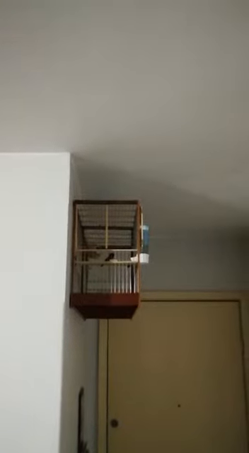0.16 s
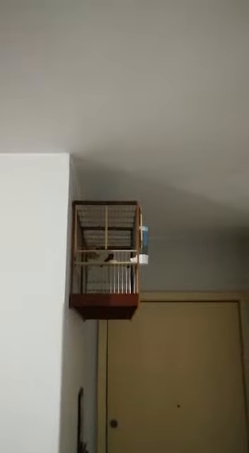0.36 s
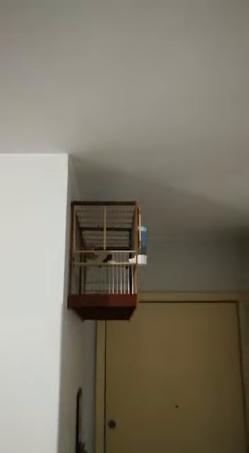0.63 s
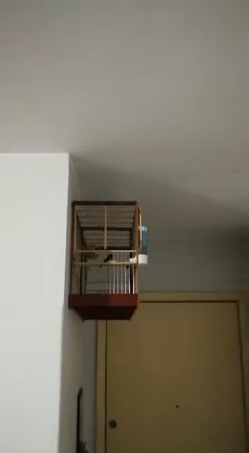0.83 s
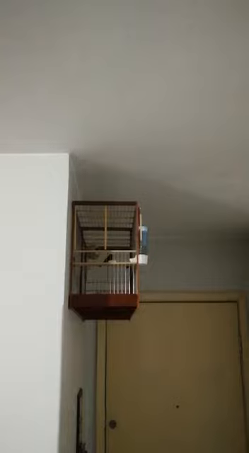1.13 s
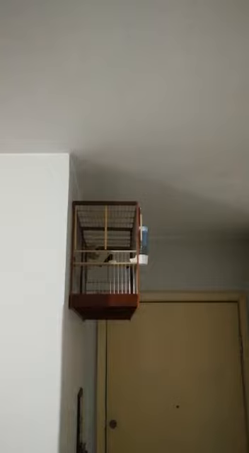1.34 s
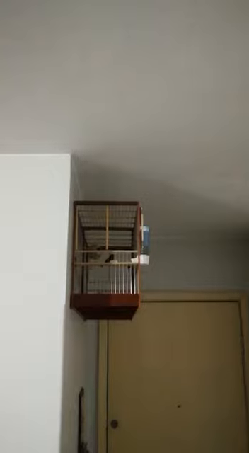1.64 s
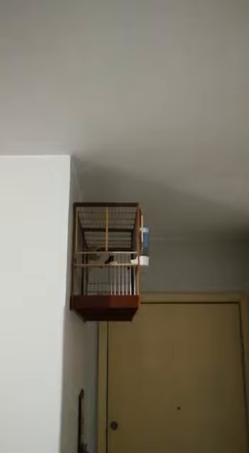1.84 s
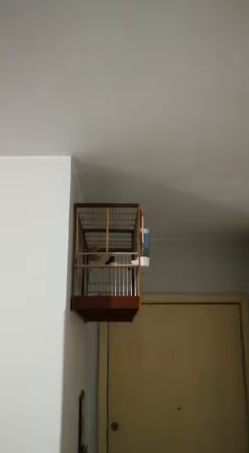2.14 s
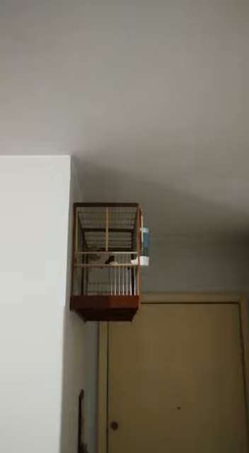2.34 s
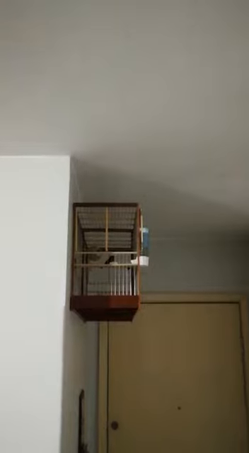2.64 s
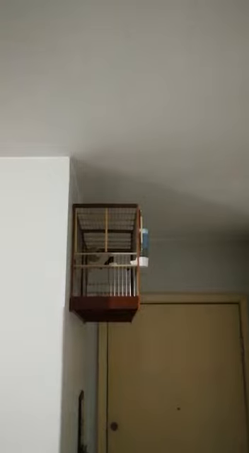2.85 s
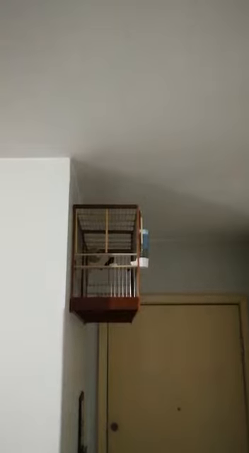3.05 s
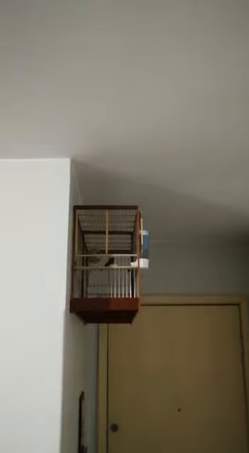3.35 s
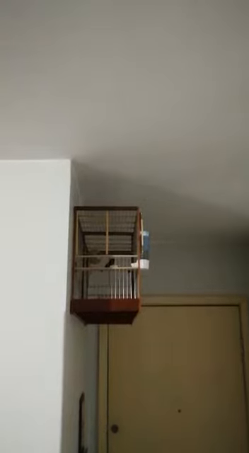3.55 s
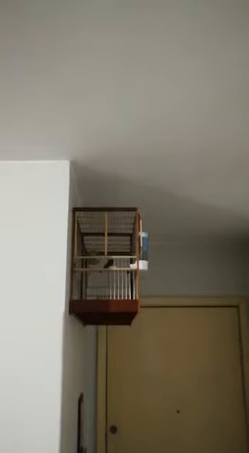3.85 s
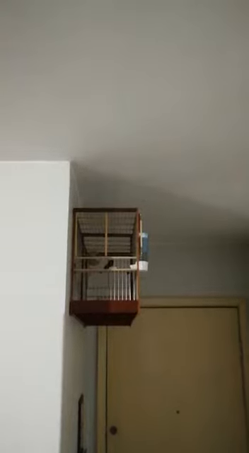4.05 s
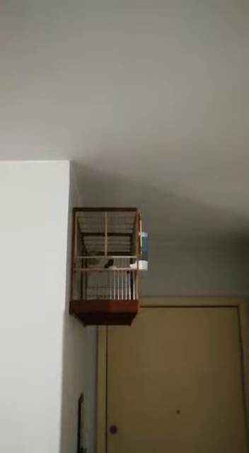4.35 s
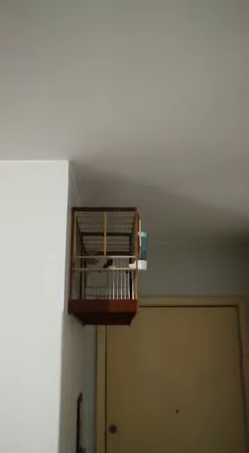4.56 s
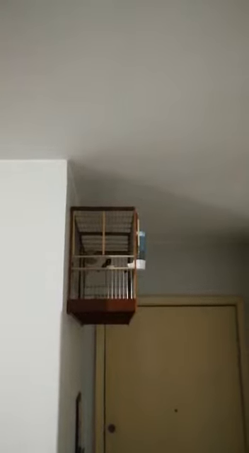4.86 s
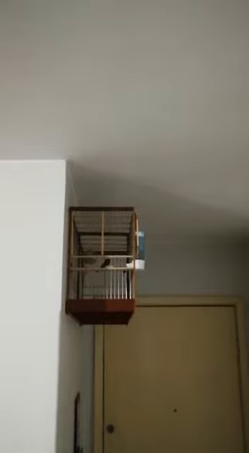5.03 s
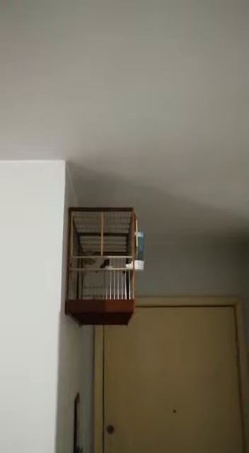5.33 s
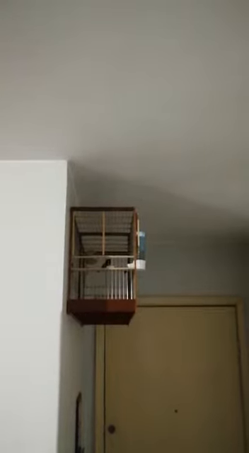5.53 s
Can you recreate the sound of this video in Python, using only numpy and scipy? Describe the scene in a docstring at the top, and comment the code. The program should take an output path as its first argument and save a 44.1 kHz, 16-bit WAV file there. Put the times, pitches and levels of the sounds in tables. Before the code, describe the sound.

A small songbird in a cage sings in a bare room, heard by a stereo microphone with close, dense echoes. At once come two short whistles, the second higher and swelling, then a faint hoarse note. Around 0.4 to 0.6 s a low buzzy slur dips and sweeps upward, followed at 0.65 s by a very loud, sharp rising chip. Soft, airy wheezes slide downward until about 1.4 s. The background, briefly ducked by automatic level control, returns as quiet hiss, low rumble and wavering hum. Barely audible wheezes and a faint rustle pass near 2.8 s. Quick small chirps come at 3.2 to 3.3 s, with a soft low boom near 3.5 s. The second phrase starts at 3.95 s: two whistles, soft wheezes, two brighter rising whistles around 4.45 to 4.6 s, and a final dip-and-rise slur from 4.7 to 4.95 s. Reverberation fades into room noise.

```python
"""Caged seedeater in a bare room

A caged seedeater sings two quick phrases of slurred whistles, with soft wheezy notes among and between them.
Each note is a gliding tone with overtones and air hiss; hard walls close by smear it with echoes and a dense tail.
Under the song lie filtered-noise hiss and rumble, wavering hum lines, a faint rustle and one soft low boom.
A stereo pair of microphones hears it all, and the recorder's gain control ducks everything on loud notes."""
import sys
import numpy as np
from scipy import signal
from scipy.fft import rfft, irfft
from scipy.io import wavfile
from scipy.ndimage import uniform_filter1d

SR = 44100
rng = np.random.default_rng(int(sys.argv[2]) if len(sys.argv) > 2 else 0)


def store_pcm(level_fs):
    """Save levels as 16-bit WAV."""
    pcm = np.round(np.clip(level_fs, -1, 1) * 32767).astype(np.int16)
    wavfile.write(sys.argv[1], SR, np.atleast_2d(pcm).T)


N = 250929
TIME = np.arange(N) / SR
BINS = np.fft.rfftfreq(N, 1 / SR)

# room hiss, colour only: (frequency [Hz], relative density [dB])
HISS_COLOUR = [(260, -35.5), (450, -3.5), (477, -11), (554, -7), (691, -5.5), (723, -5), (778, -4.5),
               (1090, -5), (1920, -4), (3580, -4.5), (4880, -6.5), (5750, -9), (15500, -30)]
# low rumble, colour only: (frequency [Hz], relative density [dB])
RUMBLE_COLOUR = [(20, -6), (45, -8), (66, -4.5), (85, -6), (112, 5), (140, -5), (200, -4.5), (290, -7.5),
                 (370, -18), (430, -8), (500, -32.5), (1000, -60)]
# how alike the two microphones hear the background: (frequency [Hz], correlation [-1 to 1])
LIKENESS = [(60, 0.94), (130, 0.99), (290, 0.83), (640, -0.58), (1410, 0.44), (3100, -0.29), (6820, 0.26),
            (15000, -0.89)]
# tilt of the background between the channels: (frequency [Hz], left minus right [dB])
BACKGROUND_TILT = [(60, 1.5), (110, -0.5), (200, 0), (380, -1.5), (700, 5), (1290, -4), (2380, -3.5),
                   (4400, -3), (8120, -2.5), (15000, 5)]
# appliance hum lines: (frequency [Hz], level before the waver [dB])
HUM_LINES = [(70, -69.5), (113, -66.5), (169, -79), (339, -78.5), (737.5, -80.5), (1109, -84.5),
             (1631, -81), (1884, -82)]
# soft boom ringing on in the room's bass resonance: (time [s], level [dB])
BOOM_LEVEL = [(3.43, -63), (3.52, -53.5), (3.6, -63.5), (3.9, -64), (4.15, -67)]
# faint rustle: (start [s], length [s], level at its middle, before the room [dB])
RUSTLE_EVENT = (2.775, 0.11, -55)
# colour of the rustle: (frequency [Hz], relative density [dB])
RUSTLE_COLOUR = [(2500, -33), (3900, -2), (4900, 1.5), (6000, -2), (7300, -7), (8500, -25.5), (14000, -43)]
# first echoes from the nearby wall and ceiling: (delay [ms], left gain, right gain)
NEAR_ECHOES = [(1.9, 0.42, -0.18), (4.3, -0.85, 0.0011), (8.1, 0.18, 0.21), (13.7, -0.23, -0.15)]
# how long the room rings: (frequency [Hz], time to fall 60 dB [s])
RING_TIME = [(2500, 0.48), (3700, 0.36), (5200, 0.35), (8000, 0.29), (11000, 0.15), (15000, 0.08)]
# each microphone port colours the song in its own way: (frequency [Hz], left minus right [dB])
PORT_TILT = [(2900, 2.5), (3650, 2.5), (4100, -1.5), (4500, -3.5), (5200, -7.5), (6000, -6), (7400, -2),
             (9000, 1), (11000, 4), (14000, 4.5)]
# overtone strength by where the overtone falls: (frequency [Hz], level against the fundamental [dB])
OVERTONE_LEVEL = [(5500, -9), (6100, -14.5), (6800, -28), (7400, -21.5), (8000, -27.5), (9100, -26),
                  (10200, -26.5), (11200, -32), (12300, -30.5), (13600, -34.5), (14200, -40.5),
                  (15500, -42.5)]
# air hiss that goes with the whistle: (frequency [Hz], relative density [dB])
AIR_COLOUR = [(2000, -42), (3200, -7.5), (4500, -8.5), (6300, -0.5), (7300, -3.5), (9000, -10),
              (12000, -26), (16000, -20)]
# clear notes, each one smooth bend: (start [s], length [s], first, middle, last pitch [Hz],
# level [dB], swell over the note [dB], overtone offset [dB])
WHISTLE_NOTES = [ (0, 0.056, 3102, 3018, 2922, -32.5, 5, 3.5),
                 (0.065, 0.098, 3627, 3720, 3520, -24, 15, -8),
                 (0.643, .022, 5193, 5257, 5410, -9.5, 3, -3.5),
                 (0.661, 0.047, 4717, 5040, 5367, -10.5, -1, -4.5),
                 (3.144, .05, 3610, 3590, 3570, -60.5, 2.5, -24),
                 (3.198, 0.056, 3970, 4133, 3890, -42.5, 1, -8),
                 (3.235, 0.056, 3902, 3807, 3803, -30, 10, -22),
                 (3.287, 0.042, 3733, 3715, 3584, -31.5, -4.5, 9.5),
                 (3.624, 0.12, 3606, 3650, 3696, -65.5, -8, -12),
                 (3.954, 0.0973, 3056, 3010, 3070, -32.5, -1, 1),
                 (4.043, .087, 3690, 3730, 3548, -24.5, 7, -8),
                 (4.448, 0.086, 4032, 4055, 4213, -24.5, 11, -2),
                 (4.518, 0.093, 4326, 4460, 4656, -18, 6.5, 2.5), ]
# slurs that dip, then sweep up: (start [s], length [s], sweep centre [s], sweep length [s],
# first, low, top pitch [Hz], low level [dB], top level [dB], overtone offset [dB])
SLUR_NOTES = [ (.364, 0.25, .529, .092, 2964, 2795, 4075, -32, -19.5, -1.5),
              (4.72, 0.24, 4.87, .086, 3085, 2812, 3972, -32.5, -23.5, 1.5), ]
# soft hoarse notes: (start [s], length [s], first pitch [Hz], last pitch [Hz],
# level [dB], rasp as rms pitch scatter [Hz])
WHEEZE_NOTES = [ (0.176, 0.17, 4340, 4290, -51.5, 187), (0.713, 0.17, 6300, 5700, -52.5, 280),
                (0.964, .17, 6190, 5200, -48.5, 345), (1.029, 0.18, 4770, 4180, -58.5, 282),
                (1.21, .18, 6120, 5140, -50.5, 338), (1.295, 0.14, 3820, 3270, -61, 277),
                (2.749, 0.096, 4940, 4880, -65.5, 170), (2.84, 0.099, 5520, 5800, -65.5, 350),
                (3.91, 0.098, 4120, 4270, -53.5, 400), (4.271, 0.11, 3944, 3990, -50, 113),
                (4.355, 0.14, 5250, 5280, -41.5, 146), (4.491, 0.18, 6170, 6100, -45.5, 283), ]

EDGE_HZ = 15700  # top of the recorded band
USUAL_DB = -24  # level of an ordinary note
# an attack or release takes at most EDGE_SHARE of a short note
ATTACK_S, RELEASE_S, EDGE_SHARE = 0.017, 0.01, 0.38
BUZZ_BELOW_HZ, BUZZ_FADE_HZ = 3180, 50.3  # alternate cycles differ only under this pitch
PURE_DB = -7  # upper overtones weaken once the pitch leaves the buzzy range
DIP_SHARE = 0.56  # a slur bottoms out this far along the part before its sweep
SAG_HZ_PER_S, SAG_DB_PER_S = 1400, 70.5  # fall of pitch and level after the sweep
SWEEP_STEP = 0.5  # 0 = one even glide, 1 = two distinct steps


def amp(db):
    """Decibels to gain."""
    return 10 ** (np.asarray(db) / 20)


def unit(x):
    """Scales to rms 1."""
    return x / np.sqrt(np.mean(x ** 2) + 1e-20)


def read(points, hz):
    """Reads a spectrum on a log-frequency axis."""
    f, value = np.transpose(points)
    return np.interp(np.log(hz + 1), np.log(f + 1), value)


def noise(colour):
    """Noise of rms 1 with the given spectrum."""
    spectrum = rfft(rng.standard_normal(N)) * amp(read(colour, BINS))
    return unit(irfft(spectrum, N))


def wander(rate_hz, size=N):
    """A random drift of rms 1, with movement faster than the rate steeply reduced."""
    hz = np.fft.rfftfreq(size, 1 / SR)
    spectrum = rfft(rng.standard_normal(size)) / (1 + (hz / rate_hz) ** 4)
    return unit(irfft(spectrum, size))


def sine(hz):
    """A tone of rms 1 that follows a changing pitch."""
    return np.sqrt(2) * np.sin(2 * np.pi * np.cumsum(hz) / SR)


def lean(pair, tilt):
    """Tilts each frequency towards the left or the right channel."""
    half_db = read(tilt, BINS) / 2
    return irfft(rfft(pair) * amp([half_db, -half_db]), N)


def add(mix, s, sound):
    """Mixes a sound in at its time."""
    part = mix[max(round(s * SR), 0):][:len(sound)]
    part += sound[:len(part)]


def hiss_and_rumble(hiss_db=-60, rumble_db=-63, self_noise_db=-81):
    """Coloured noise shared between the microphones by frequency, plus each one's own white noise."""
    first, second = (rfft(amp(hiss_db) * noise(HISS_COLOUR) + amp(rumble_db) * noise(RUMBLE_COLOUR))
                     for _ in range(2))
    same = np.clip(read(LIKENESS, BINS), -1, 1)
    right = same * first + np.sqrt(1 - same ** 2) * second
    pair = irfft(np.array([first, right]), N)
    return lean(pair, BACKGROUND_TILT) + amp(self_noise_db) * rng.standard_normal((2, N))


def hum(waver=0.54, drift_hz=0.66):
    """An appliance hums on steady lines, each wavering in level and drifting slightly in pitch."""
    total = np.zeros(N)
    for hz, db in HUM_LINES:
        level = amp(db) * (1 + waver * wander(8.24))
        total += level * sine(hz + drift_hz * wander(3.3))
    return total


def boom(hz=69, drift_hz=1.7):
    """One low room resonance swells and lingers, its pitch drifting."""
    s, db = np.transpose(BOOM_LEVEL)
    level = amp(np.interp(TIME, s, db)) * (TIME > s[0]) * (TIME < s[-1])
    return level * sine(hz + drift_hz * wander(7.2))


def rustle(ends_db=-20):
    """Coloured noise swells and dies."""
    start, length, level_db = RUSTLE_EVENT
    u = 2 * (TIME - start) / length - 1  # -1 to 1 over the rustle
    return noise(RUSTLE_COLOUR) * amp(level_db + ends_db * u ** 2) * (abs(u) < 1)


def room(x, direct_db=-3, early_db=-3, tail_db=-2, build_s=0.0088, cluster_db=3, cluster_s=0.037):
    """Direct sound, near echoes, a strong early cluster, then a tail that dies faster in the treble."""
    size = SR * 3 // 4
    taps = rng.standard_normal((2, size)) * (rng.random((2, size)) < 0.12)  # sparse reflections
    hz, t, z = signal.stft(taps, SR, nperseg=256)
    decay = amp(-60 * t / read(RING_TIME, hz)[:, None])
    shape = decay * (1 - np.exp(-t / build_s)) * amp(cluster_db * np.exp(-t / cluster_s))
    tail = signal.istft(z * shape, SR, nperseg=256)[1]
    response = amp(tail_db) * tail / np.linalg.norm(tail, axis=1, keepdims=True)
    left_lag = 28  # samples: the bird is nearer the right microphone
    response[[0, 1], [left_lag, 0]] += amp(direct_db)
    for ms, left, right in NEAR_ECHOES:
        response[:, round(ms * SR / 1000)] += amp(early_db) * np.array([left, right])
    return signal.fftconvolve(x[None], response, axes=1)[:, :N]


def edges(t):
    """Attack, hold and release of a note."""
    attack, release = np.minimum([ATTACK_S, RELEASE_S], EDGE_SHARE * t[-1])
    ramp = np.clip(np.minimum(t / attack, (t[-1] - t) / release), 0, 1)
    return np.sin(np.pi / 2 * ramp) ** 2


def syrinx(hz, effort_db, overtone_db, rasp_hz, half_db, air, scatter_hz=420, flutter_db=2.0,
           air_db=-40, air_growth=0.39, fifth_db=-20, overtone_growth=0.37, half_slip=0.93, wobble_hz=9):
    """The syrinx whistles one gliding tone; overtones and half-pitch lines leak through the throat."""
    size = len(hz)
    scatter, flutter, slip, wobble = (wander(rate, size=2 ** 14)[:size]
                                      for rate in (scatter_hz, 110, 160, 60))
    buzz = 1 / (1 + np.exp((hz - BUZZ_BELOW_HZ) / BUZZ_FADE_HZ))
    hz = hz + rasp_hz * scatter + wobble_hz * wobble
    effort_db = effort_db + flutter_db * flutter
    phase = 2 * np.pi * np.cumsum(hz) / SR
    # on low notes alternate cycles differ, unsteadily: a fuzzy line between the first two harmonics
    half_line = amp(half_db) * buzz * np.sin(phase + phase / 2 + half_slip * slip)
    tone = np.sin(phase) + half_line
    # overtones strengthen as effort rises within the note
    bright_db = overtone_db + overtone_growth * (effort_db - effort_db.mean())
    for k in range(2, 6):
        upper_db = fifth_db * (k > 4) + PURE_DB * (1 - buzz) * (k > 3)
        weight = amp(bright_db + read(OVERTONE_LEVEL, k * hz) + upper_db)
        tone += weight * (k * hz < EDGE_HZ) * np.sin(k * phase)
    hiss = amp(air_db + air_growth * (effort_db - USUAL_DB)) * air[:size]  # hard-driven notes hiss more
    return amp(effort_db) * edges(np.arange(size) / SR) * (np.sqrt(2) * tone + hiss)


def wheeze(air, length, first_hz, last_hz, level_db, rasp_hz, ends_db=-13):
    """A hoarse note slides straight in pitch, swelling and dying, its pitch scattered at random."""
    u = np.linspace(-1, 1, round(length * SR))
    hz = np.linspace(first_hz, last_hz, len(u))
    effort_db = level_db + ends_db * abs(u) ** 1.18
    return syrinx(hz, effort_db, overtone_db=-21.5, rasp_hz=rasp_hz, half_db=-50, air=air)


def whistle(air, length, first_hz, middle_hz, last_hz, level_db, swell_db, overtone_db):
    """A clear note bends through three pitches while its effort grows or fades evenly."""
    u = np.linspace(-1, 1, round(length * SR))
    slope, bend = (last_hz - first_hz) / 2, (first_hz + last_hz) / 2 - middle_hz
    hz = middle_hz + slope * u + bend * u ** 2
    rasp_hz = 17 * amp(0.22 * (level_db - USUAL_DB))  # loud notes are rougher
    return syrinx(hz, level_db + swell_db * u / 2, overtone_db, rasp_hz, half_db=-17.0, air=air)


def slur(air, length, sweep_at, sweep_s, first_hz, low_hz, top_hz, low_db, top_db, overtone_db):
    """A low buzzy dip climbs in two soft steps to a louder, purer whistle, which then sags."""
    t = np.arange(0, length, 1 / SR)
    begin, end = sweep_at - sweep_s / 2, sweep_at + sweep_s / 2
    early = np.minimum(t / begin, 1)
    along = np.clip((t - begin) / sweep_s, 0, 1)
    dip = low_hz + (first_hz - low_hz) * (1 - early / DIP_SHARE) ** 2
    up = along - SWEEP_STEP * np.sin(4 * np.pi * along) / (4 * np.pi)
    midway = np.sin(np.pi * up)
    held = np.maximum(t - end, 0)
    hz = dip + (top_hz - dip) * up - SAG_HZ_PER_S * held
    effort_db = low_db + (top_db - low_db) * along ** 0.5 - SAG_DB_PER_S * held
    bright_db = overtone_db + 1.0 - 3 * up - 4 * midway
    rasp_hz = 10 + 26 * up + 25 * midway  # roughest during the sweep
    return syrinx(hz, effort_db, bright_db, rasp_hz, half_db=-27, air=air)


def bird():
    """All the notes of the song, each with its own stretch of air hiss."""
    out, air = np.zeros(N), noise(AIR_COLOUR)
    notes = [(start, whistle, row) for start, *row in WHISTLE_NOTES]
    notes += [(start, wheeze, row) for start, *row in WHEEZE_NOTES]
    notes += [(start, slur, (length, sweep_at - start, *row))
              for start, length, sweep_at, *row in SLUR_NOTES]
    for start, voice, row in notes:
        add(out, start, voice(np.roll(air, -round(start * SR)), *row))
    return out


def scene():
    """The bird and the rustle in the room, over the background and the boom."""
    close = lean(room(bird() + rustle()), PORT_TILT)
    return close + hiss_and_rumble() + hum() + boom()


def record(dry, threshold_db=-28, squeeze=0.34, recover_db_per_s=40, attack_s=0.022):
    """Gain control falls on loud notes and recovers slowly; then the band limit."""
    power = uniform_filter1d((dry ** 2).mean(0), size=500)
    power_db = 10 * np.log10(abs(power) + 1e-12)
    cut_db = squeeze * np.maximum(power_db - threshold_db, 0)
    # each cut is held, then let go at a constant rate
    fall = TIME * recover_db_per_s
    held_db = np.maximum.accumulate(cut_db + fall) - fall
    keep = np.exp(-1 / (attack_s * SR))
    smooth_db = signal.lfilter([1 - keep], [1, -keep], held_db)
    ducked = dry * amp(-smooth_db)
    low_pass = signal.firwin(601, EDGE_HZ, window=("kaiser", 9), fs=SR)
    return signal.oaconvolve(ducked, low_pass[None], "same", axes=1)


dry = scene()
out = record(dry)
store_pcm(out)
```